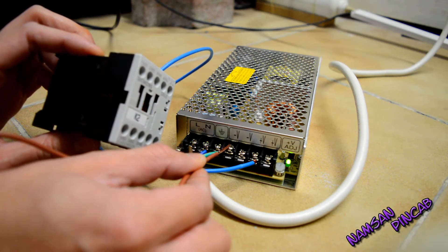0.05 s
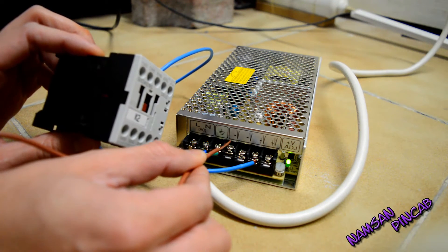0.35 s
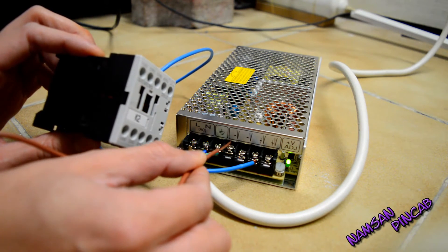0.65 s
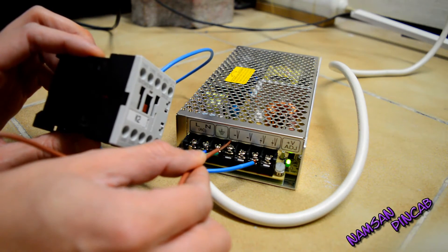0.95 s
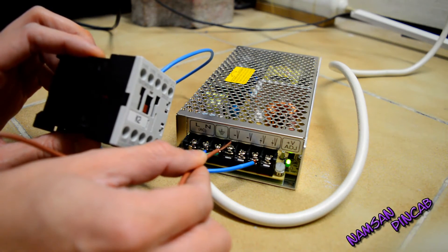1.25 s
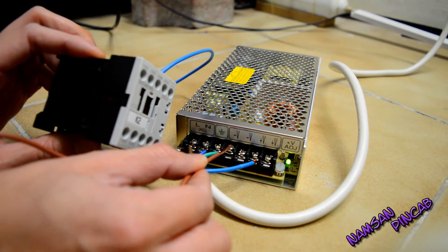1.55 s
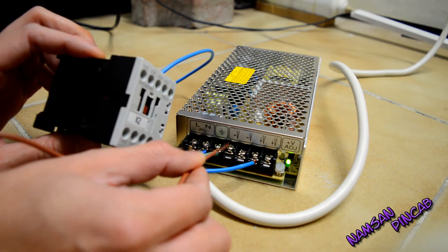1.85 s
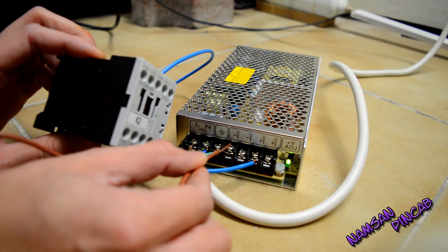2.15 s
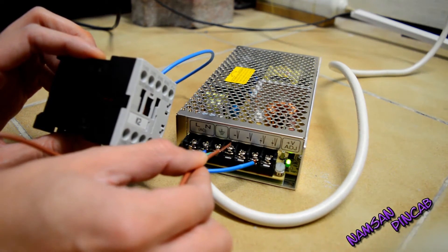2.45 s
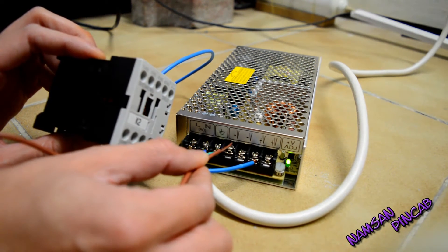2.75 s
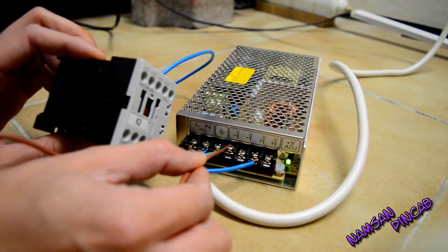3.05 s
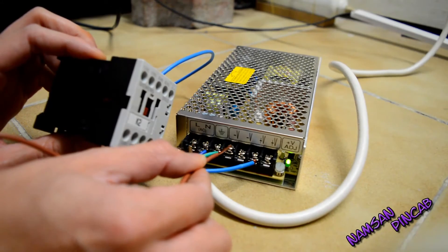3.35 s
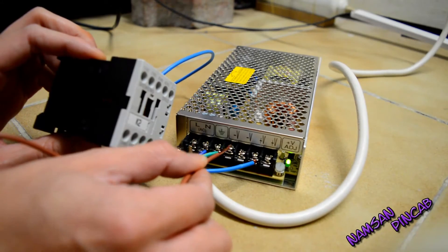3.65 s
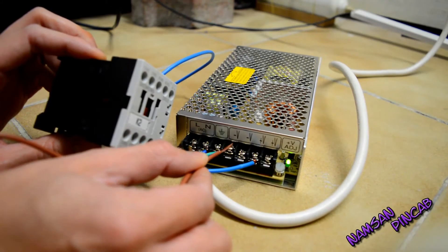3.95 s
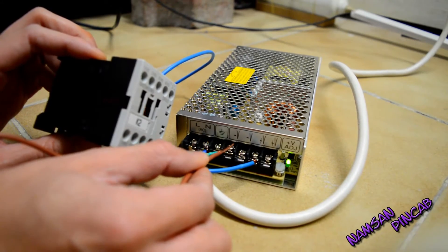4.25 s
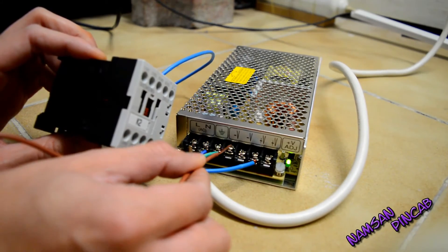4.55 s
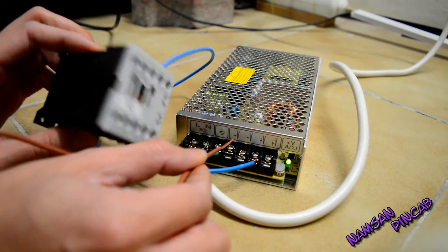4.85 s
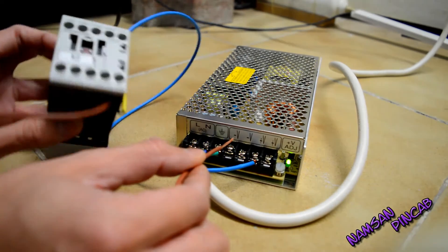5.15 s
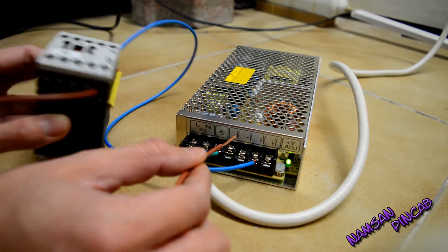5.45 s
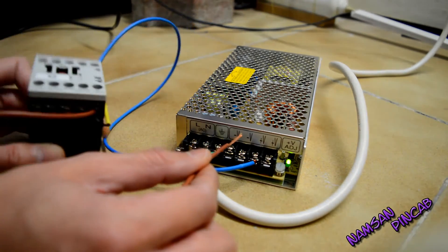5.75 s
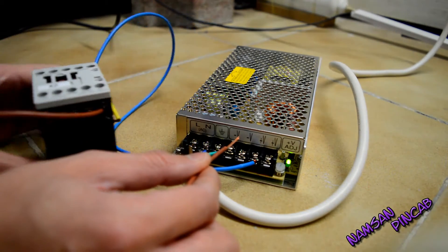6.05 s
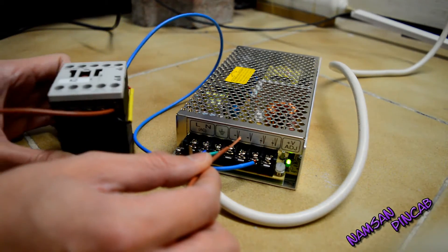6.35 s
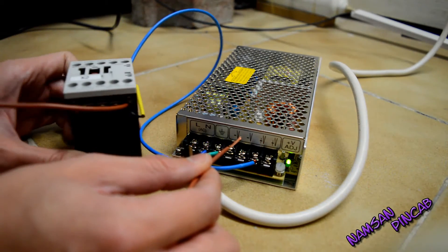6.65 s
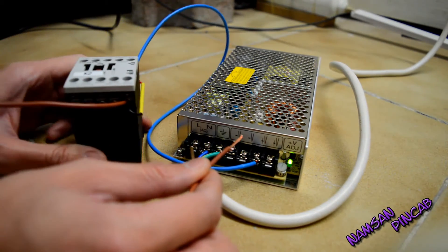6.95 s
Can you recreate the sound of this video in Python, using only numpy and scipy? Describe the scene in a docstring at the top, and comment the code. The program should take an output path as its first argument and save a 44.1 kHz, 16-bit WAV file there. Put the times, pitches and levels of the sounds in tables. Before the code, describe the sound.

Close up in a small room, a relay switch pulls in and drops out with hard, slightly distorted double clacks and a faint ring of springs. A few spaced pairs speed up into irregular chatter, which stops after nearly five seconds. Much quieter handling follows: light ticks and rubbing, the plastic housing knocking onto a tabletop, and a short scrape over faint room hiss.

```python
"""Sharp, uneven clacks: a hand-held contactor pulls in and drops out as its coil lead is tapped on a
power supply terminal. Pulling in, the armature slams on the core and the springs ring; dropping out,
the contacts snap apart and the armature hits its back stop. Then the case is turned, set on the table
and slid along. The clacks overload a close microphone in a small room."""
import sys
import numpy as np
from scipy import signal
from scipy.fft import rfft, irfft, next_fast_len
from scipy.io import wavfile
from scipy.ndimage import map_coordinates

SR = 44100
rng = np.random.default_rng(int(sys.argv[2]) if len(sys.argv) > 2 else 0)


def digitize_waveform(pressure):
    """Quantize a signal to 16-bit integers and store it at the path in sys.argv[1].

    Rows of a 2-D input are taken as channels; values are limited to [-1, 1].
    """
    field = np.atleast_2d(pressure).T
    bounded = np.clip(field, -1, 1)
    quanta = np.round(bounded * 32767).astype(np.int16)
    wavfile.write(sys.argv[1], SR, quanta)


N = 317520
TOP_HZ = 15700
RING_TIME_S = np.arange(SR // 18) / SR


def amp(db):
    """Decibels to gain."""
    return 10 ** (np.asarray(db) / 20)


def along(points, hz):
    """Interpolate (frequency, value) points on a log axis."""
    point_hz, values = np.transpose(points)
    return np.interp(np.log(hz + 1), np.log(point_hz + 1), values)


def filtered(x, response):
    """Apply a gain given as a function of frequency."""
    size = next_fast_len(N + SR // 2)
    return irfft(rfft(x, size) * response(np.fft.rfftfreq(size, 1 / SR)), size)[:N]


def noise(colour_db, envelope=1):
    """Modulated, then coloured noise at rms 1."""
    x = filtered(rng.standard_normal(N) * envelope, lambda hz: amp(colour_db(hz)))
    return x / np.sqrt(np.mean(x ** 2) + 1e-20)


def case_modes(colour, t60_s, count=420):
    """Crowded modes of a plastic case; t60_s holds at 4 kHz, lower modes last longer."""
    hz = 100 + (TOP_HZ - 100) * (np.arange(count) + rng.random(count)) / count
    return np.transpose([hz, along(colour, hz), t60_s * (hz / 4000) ** -.2])


def strike(times_s, db, modes, rise_s, vary, t=RING_TIME_S):
    """Blows on modes, varying in strength and phase; rise_s holds at 4 kHz, lower modes swell slower."""
    hz, mode_db, t60_s = np.transpose(modes)[:, :, None]
    swell = 1 - np.exp(-t / (rise_s * np.sqrt(4000 / hz) + 1e-6))
    phase = 2 * np.pi * (hz * t + rng.random(hz.shape))
    envelopes = amp(mode_db - 60 * t / t60_s) * swell / np.sqrt(np.sum(amp(mode_db) ** 2) / 2)
    scatter = vary * rng.standard_normal((len(times_s), 2, len(hz)))
    sines = (1 + scatter[:, 0]) @ (envelopes * np.sin(phase))
    cosines = scatter[:, 1] @ (envelopes * np.cos(phase))
    rings = (sines + cosines) / np.sqrt(1 + 2 * vary ** 2)
    out = np.zeros(N + SR)
    for start_s, gain, ring in zip(times_s, amp(db) * np.ones(len(times_s)), rings):
        out[round(start_s * SR):][:len(t)] += gain * ring
    return out[:N]


# noise floor spectrum (frequency [Hz], relative density [dB])
FLOOR_COLOUR = [(12, -36.5), (20, -14), (59, -5.5), (148, -15.5), (185, -4.5), (213, -8.5), (352, -14.5),
                (393, -12), (465, -13.5), (534, -14.5), (985, -12), (1230, -15), (1500, -8), (1770, -17.5),
                (15500, -28)]

def noise_floor(rms_db):
    """Steady room rumble and microphone hiss."""
    return amp(rms_db) * noise(lambda hz: along(FLOOR_COLOUR, hz))


# room decay (frequency [Hz], t60 [s])
ROOM_DECAY = [(150, 0.33), (900, 0.54), (3000, 0.46), (6500, 0.36), (9500, 0.28), (15000, 0.15)]

def room(x):
    """The walls leave a tail that builds quickly and dies sooner in the treble."""
    hz, t, spectrum = signal.stft(rng.standard_normal(SR * 3 // 4), SR, nperseg=256)
    decay = amp(-60 * t / along(ROOM_DECAY, hz)[:, None])
    tail = signal.istft(spectrum * decay, SR, nperseg=256)[1]
    tail *= 1 - np.exp(-np.arange(len(tail)) / SR / .0029)
    return signal.fftconvolve(x, tail / np.linalg.norm(tail))[:N]


def table_echoes(x, t60_s):
    """Sparse early reflections off the table and the things on it."""
    t = np.arange(SR // 8) / SR
    echoes = rng.standard_normal(len(t)) * (rng.random(len(t)) < .05)
    echoes *= (t > .002) * amp(-60 * t / t60_s)
    return signal.fftconvolve(x, echoes / np.linalg.norm(echoes))[:N]


def friction(colour_db, grain_db, snag_db):
    """Countless tiny slips of uneven size, bunched where the surfaces snag."""
    def wander(samples):
        return map_coordinates(rng.standard_normal(N // samples + 4), [np.arange(N) / samples], order=1)
    slip_sizes = amp(grain_db * wander(samples=40) + snag_db * wander(samples=400))
    return noise(colour_db, slip_sizes)


def strokes(rows, attack_s, sag_db_per_s, release_s):
    """Gain of friction strokes: each takes hold, eases off, then dies away."""
    t = np.arange(N) / SR
    gain = np.zeros(N)
    for start_s, length_s, db in rows:
        age_s = t - start_s
        release_db = 60 * np.maximum(age_s - length_s, 0) / release_s
        gain += np.clip(age_s / attack_s, 0, 1) * amp(db - sag_db_per_s * np.abs(age_s) - release_db)
    return gain


# rubs on the case (time [s], length [s], level [dB])
RUB_STROKES = [(5.07, 0.073, -33), (5.16, 0.023, -43), (5.22, .02, -35.5), (5.41, .05, -36.5),
               (5.515, 0.087, -33.5), (5.62, .03, -46.5), (5.662, 0.017, -36.5), (5.733, .04, -41.5),
               (5.86, .1, -39), (6.075, .015, -37), (6.135, .05, -30), (6.485, .1, -46),
               (6.692, 0.018, -35), (6.795, 0.056, -45), (6.885, 0.068, -37.5), (7.09, 0.048, -44.5)]
# rub spectrum (frequency [Hz], relative density [dB])
RUB_COLOUR = [(530, -15), (900, -11.5), (1370, -3.5), (2000, -10.5), (2330, -2.5), (3140, -12),
              (3800, -5.5), (7150, -6.5), (9510, -0.5), (15500, -25.5)]
GRIP_FROM_S, GRIP_DB = 4.1, -51

def rubbing():
    """Fingers and wires rub on the case; the shifting grip rustles faintly in between."""
    grip = amp(GRIP_DB) * (np.arange(N) / SR > GRIP_FROM_S)
    rubs = strokes(RUB_STROKES, attack_s=.0117, sag_db_per_s=62, release_s=.16)
    return np.hypot(grip, rubs) * friction(lambda hz: along(RUB_COLOUR, hz), grain_db=2, snag_db=2)


# pushes over the table (time [s], length [s], level [dB])
SLIDE_STROKES = [(6.138, .13, -26.5), (6.59, .12, -44.5), (6.88, .09, -43)]
# slide spectrum (frequency [Hz], relative density [dB])
SLIDE_COLOUR = [(290, -26), (500, -17), (1030, -19.5), (1330, -4), (1990, -19.5), (2330, -11), (3740, -15),
                (5510, -10.5), (9930, -9), (15500, -32.5)]
# case resonances in the slide (frequency [Hz], width [Hz], boost [dB])
SLIDE_PEAKS = [(1300, 200, 3.5), (2800, 350, 8), (5440, 350, 10)]

def sliding():
    """Friction on the table rings the case."""
    def colour_db(hz):
        peaks_db = sum(db / (1 + (2 * (hz - peak_hz) / width_hz) ** 2)
                       for peak_hz, width_hz, db in SLIDE_PEAKS)
        return along(SLIDE_COLOUR, hz) + peaks_db
    pushes = strokes(SLIDE_STROKES, attack_s=.027, sag_db_per_s=43.5, release_s=.26)
    return pushes * friction(colour_db, grain_db=2, snag_db=.5)


# wire in its terminal (frequency [Hz], relative level [dB], t60 [s])
SQUEAK_MODES = [(1600, -5, 0.23), (1665, -5, 0.17)]

def wire_squeak():
    """A wire turns in its terminal with one faint squeak."""
    return strike([5.255], -37, SQUEAK_MODES, rise_s=.013, vary=.27, t=np.arange(SR // 6) / SR)


# light contacts (time [s], level [dB])
TICK_HITS = [(.2015, -34), (0.8756, -29), (.8895, -15.5), (.918, -25), (1.541, -28), (4.128, -17),
             (4.9338, -25), (5.3412, -20), (5.4472, -20), (5.4545, -17), (6.563, -34), (6.875, -29),
             (6.882, -25), (6.916, -22)]
# tick spectrum (frequency [Hz], relative density [dB])
TICK_COLOUR = [(100, -7), (600, -13.5), (1300, -2.5), (3000, -3), (5500, 0), (8000, 2), (10000, 4),
               (12000, -5.5), (15500, -12)]

def ticks():
    """The lead and loose parts make small hard contacts that hardly ring."""
    times_s, db = np.transpose(TICK_HITS)
    return strike(times_s, db, case_modes(TICK_COLOUR, t60_s=.019), rise_s=.0001, vary=.3)


# corners landing (time [s], level [dB], loss on first bounce [dB])
CORNER_LANDINGS = [(5.7977, -11.5, 9.5), (5.835, -20, 19), (5.9524, -6, 8)]
# knock spectrum (frequency [Hz], relative density [dB])
KNOCK_COLOUR = [(100, -28), (180, -12.5), (300, -11.5), (500, -14.5), (800, 0.5), (1500, -10), (2000, -7.5),
                (5000, -9), (10000, -7), (12500, -23.5), (15500, -38.5)]
# case on the table (frequency [Hz], relative level [dB], t60 [s])
ON_TABLE_MODES = [(740, -19, 0.034), (866, -11.5, 0.041), (1194, -18, 0.056), (1280, -9.5, 0.017),
                  (1360, -2, 0.024), (1633, -8.5, 0.018)]
FIRST_FLIGHT_S, FLIGHT_RATIO = .0145, .89

def set_down(hits=5):
    """Corner after corner knocks on the table and bounces ever faster and softer."""
    land_s, first_db, loss_db = np.transpose(CORNER_LANDINGS)[:, :, None]
    bounce = np.arange(hits)
    delays_s = FIRST_FLIGHT_S * (np.cumsum(FLIGHT_RATIO ** bounce) - 1) / FLIGHT_RATIO
    times_s = (land_s + delays_s).ravel()
    db = (first_db - loss_db * bounce ** .7).ravel()
    knocks = strike(times_s, db - .5, case_modes(KNOCK_COLOUR, t60_s=.038), rise_s=.0006, vary=.52)
    return knocks + strike(times_s, db + .5, ON_TABLE_MODES, rise_s=.0001, vary=1)


# carrier rattle spectrum (frequency [Hz], relative density [dB])
CARRIER_COLOUR = [(100, -31), (500, -26), (850, 1.5), (1250, 4), (1800, -2.5), (3500, 1.5), (8000, -15),
                  (11500, -12.5), (15500, -46.5)]

def carrier_rattle(times_s, db, t60_s, rise_s, vary):
    """The contact carrier rattles as the armature moves."""
    return strike(times_s, db, case_modes(CARRIER_COLOUR, t60_s), rise_s, vary)


# dull clack of a slow fall back (frequency [Hz], relative density [dB])
FALL_BACK_COLOUR = [(100, -29), (470, -12), (860, 1), (1900, -9.5), (2500, 2.5), (3600, -8), (4500, -4),
                    (7100, -5.5), (10000, -10), (15500, -26)]
TWITCH_S, FALL_BACK_S = .8812, .9012
TRAVEL_S, RETURN_S = .0145, .0125  # armature flight: stop to core, core to stop

def false_start():
    """One tap is too brief to pull in: the armature twitches and falls back; no steel rings."""
    twitch = carrier_rattle([TWITCH_S], -13, t60_s=.025, rise_s=.0005, vary=.5)
    stop_modes = case_modes(FALL_BACK_COLOUR, t60_s=.018)
    fall = strike([FALL_BACK_S], 5.5, stop_modes, rise_s=.003, vary=.5)
    rebound = strike([FALL_BACK_S + RETURN_S], -17, stop_modes, rise_s=.0003, vary=.45)
    return twitch + fall + rebound


# contact snap spectrum (frequency [Hz], relative density [dB])
SNAP_COLOUR = [(100, -18.5), (500, -18), (1000, -7), (3000, -11.5), (6000, -5), (9300, -6.5), (11500, -8),
               (15500, -12)]

def contact_snap(times_s, db, t60_s, rise_s, vary):
    """The contacts click as they meet or part."""
    return strike(times_s, db, case_modes(SNAP_COLOUR, t60_s), rise_s, vary)


# steel parts (frequency [Hz], relative level [dB], t60 [s])
STEEL_MODES = [(3864, -11.5, 0.029), (6220, -16.5, 0.023), (6960, -4, 0.018), (8764, 1, 0.017),
               (8850, -1, 0.022), (9200, -11.5, 0.014), (9460, 0.5, 0.021), (9680, -1.5, 0.011),
               (10400, -7, 0.027), (11020, -10, 0.027)]

def steel_ring(times_s, db, rise_s, detune=.012):
    """The steel parts seat differently on each blow, which shifts their modes slightly."""
    hz, mode_db, t60_s = np.transpose(STEEL_MODES)
    shifts = 1 + detune * rng.standard_normal((len(times_s), len(hz)))
    return sum(strike([start_s], blow_db, np.transpose([hz * shift, mode_db, t60_s]), rise_s, vary=.7)
               for start_s, blow_db, shift in zip(times_s, db * np.ones(len(times_s)), shifts))


# housing resonances (frequency [Hz], relative level [dB], t60 [s])
HOUSING_MODES = [(709, -2.5, 0.026), (850, 1.5, 0.015), (935, -3.5, 0.041), (1217, -3.5, 0.035),
                 (1640, 1, 0.027), (2352, 4, 0.018), (2602, -6.5, 0.038), (4054, 0, 0.029),
                 (5000, -11, 0.015), (6110, 3, 0.027), (6700, 6.5, 0.0032), (8077, 5.5, 0.011),
                 (9030, -1, 0.021)]

def housing_ring(times_s, db, rise_s):
    """The armature's impacts ring the housing."""
    return strike(times_s, db, HOUSING_MODES, rise_s, vary=1)


def overload_thump(times_s, db, width_s):
    """A brief low thump as the slam overloads the microphone input."""
    age = RING_TIME_S / width_s
    impulses = np.bincount(np.round(times_s * SR).astype(int), amp(db), N)
    return signal.fftconvolve(impulses, (1 - age) * np.exp(-age))[:N]


# back stop clack spectrum (frequency [Hz], relative density [dB])
BACK_STOP_COLOUR = [(100, -22.5), (450, -19), (800, -3), (1900, -5), (2500, -3), (3300, -4.5), (4500, -3.5),
                    (7000, -3), (9500, -8), (11500, -7), (15500, -18)]
PARTING_DB, BACK_STOP_DB = 1, .33  # the springs drive every release equally hard
REBOUND_S = .0195

def drop_out(release_s, next_pull_s, steel_db):
    """The contacts spring apart; the armature hits its stop and rebounds, unless pulled in again first."""
    parting = steel_ring(release_s, PARTING_DB - 1.5, rise_s=.00046)
    parting += contact_snap(release_s, PARTING_DB - 6.5, t60_s=.04, rise_s=.002, vary=1.65)
    lands = release_s + RETURN_S < next_pull_s
    stop_s = release_s[lands] + RETURN_S
    stop_modes = case_modes(BACK_STOP_COLOUR, t60_s=.018)
    clack = strike(stop_s, BACK_STOP_DB + 6, stop_modes, rise_s=.0029, vary=3)
    housing = housing_ring(stop_s, BACK_STOP_DB - 1.5, rise_s=.0016)
    steel = steel_ring(stop_s, steel_db[lands] + 5.5, rise_s=.0028)
    rebound = strike(stop_s + REBOUND_S, BACK_STOP_DB - 12.5, stop_modes, rise_s=.00058, vary=.9)
    return parting + clack + housing + steel + rebound


# armature-on-core spectrum (frequency [Hz], relative density [dB])
SLAM_COLOUR = [(100, -24), (450, -21), (750, -1.5), (1100, -4.5), (1900, -4.5), (2600, -4), (4200, 2.5),
               (6300, 2), (9000, 3), (11500, -2), (15500, -13.5)]
# springs (frequency [Hz], relative level [dB], t60 [s])
SPRING_MODES = [(960, -13.5, 0.13), (1031, 11, 0.25), (1056, 11, 0.48), (1095, 8, 0.19), (2350, -1, 0.61),
                (3950, -29, 0.29), (5430, -8, .25), (6000, -3, .3), (8323, -14, .25), (8330, -16.5, .3)]
# low ring of the surging return spring (frequency [Hz], relative level [dB], t60 [s])
SURGE_MODES = [(1005, -3, 0.072), (1030, -1.5, 0.13), (1067, -1, 0.088)]
TOUCH_LEAD_S, SURGE_LAG_S = .004, .048

def pull_in(slam_s, db, thump_db):
    """The carrier rattles forward, the contacts touch, the armature slams home and the springs ring."""
    travel = carrier_rattle(slam_s - TRAVEL_S, db - 5.5, t60_s=.032, rise_s=.0051, vary=.94)
    touch = contact_snap(slam_s - TOUCH_LEAD_S, db - 11, t60_s=.016, rise_s=.00023, vary=1.6)
    slam = strike(slam_s - .0003, db + 16.5, case_modes(SLAM_COLOUR, t60_s=.025), rise_s=.0046, vary=1)
    housing = housing_ring(slam_s + .0011, db + 8.5, rise_s=.001)
    springs = strike(slam_s, db - 26, SPRING_MODES, rise_s=.002, vary=1, t=np.arange(SR // 3) / SR)
    surge = strike(slam_s + SURGE_LAG_S, db - 13, SURGE_MODES, rise_s=.0069, vary=.78,
                   t=np.arange(SR // 8) / SR)
    thump = overload_thump(slam_s + .0024, thump_db - 11, width_s=.00079)
    return travel + touch + slam + housing + springs + surge + thump


# taps of the coil lead, levels relative
# (slam time [s], release time [s], slam level [dB], low thump [dB], steel ring at back stop [dB])
COIL_TAPS = [(0.0537, 0.2114, -2.1, 2, -1), (0.567, .733, -3, -6.5, 1.5), (1.56, 1.6894, -2, 1, 1.5),
             (1.791, 1.854, -3.5, -17.5, -1.5), (2.109, 2.2073, -2.3, -14.5, -0.5),
             (2.2706, 2.356, -2.3, 7.5, 5.5), (2.4193, 2.5263, -3, -9.5, 1), (2.5953, 2.668, -2, 6, 2.5),
             (2.753, 2.8118, -3.2, 6, -3), (2.8856, 2.972, -2.2, -9.5, 2), (3.013, 3.1123, -4.5, 0, 4),
             (3.1745, 3.2142, -4, 5, 2), (3.4308, 3.5144, -3.5, 3.5, 3), (3.5338, 3.618, -5.5, -20, 0),
             (3.7122, 3.803, -2, 7.5, 0), (3.9081, 3.997, -3.5, 8, 0.5), (4.276, 4.351, -2.5, 0.5, -2.5),
             (4.482, 4.5454, -1.3, 6, 3), (4.6366, 4.717, -1.5, 7, 1.5)]

def contactor():
    """Each tap powers the magnet, which pulls the armature in and then lets it go."""
    slam_s, release_s, slam_db, thump_db, steel_db = np.transpose(COIL_TAPS)
    next_pull_s = np.append(slam_s[1:] - TRAVEL_S, np.inf)
    return pull_in(slam_s, slam_db, thump_db) + drop_out(release_s, next_pull_s, steel_db)


def impacts():
    """All hits as radiated in one direction; each call draws its own mix of the modes."""
    return contactor() + false_start() + ticks() + set_down()


def scene():
    """Direct sound over the noise floor; three other directions arrive only as reflections."""
    direct = impacts() + rubbing() + sliding() + wire_squeak()
    off_axis = [impacts() for _ in range(3)]
    walls = sum(room(x) for x in [direct, *off_axis])
    table = table_echoes(off_axis[0], t60_s=.024)
    return (direct + amp(-17) * table + amp(-19) * walls + noise_floor(rms_db=-48.5))[None]


def record(dry):
    """The microphone input clips on the clacks; nothing passes above TOP_HZ."""
    clipped = np.clip(dry[0], -1, 1)
    return filtered(clipped, lambda hz: hz < TOP_HZ)[None]


dry = scene()
out = record(dry)
digitize_waveform(out)
```